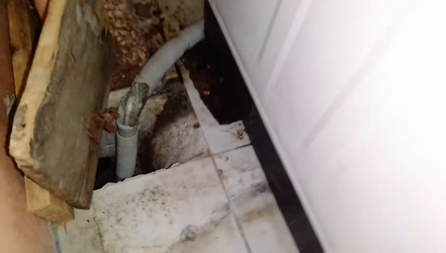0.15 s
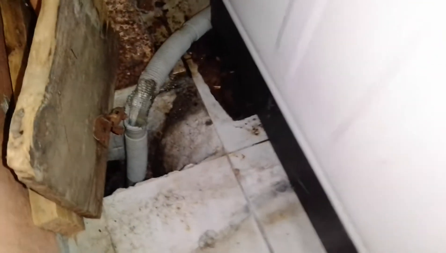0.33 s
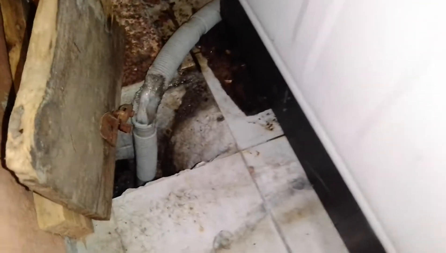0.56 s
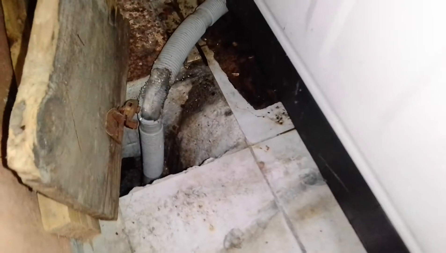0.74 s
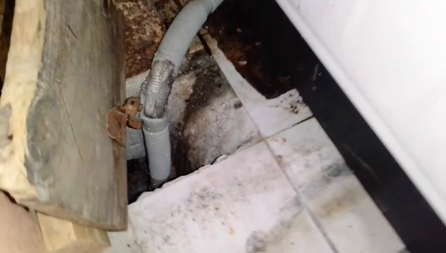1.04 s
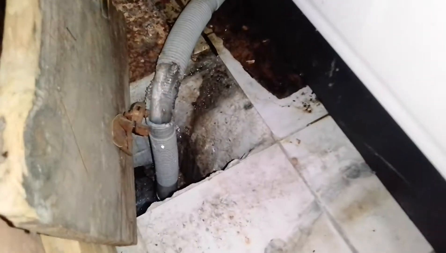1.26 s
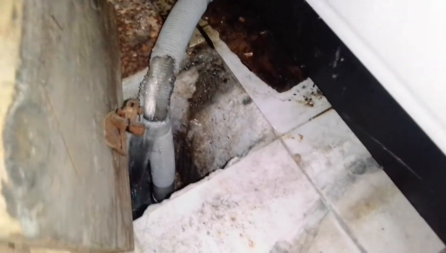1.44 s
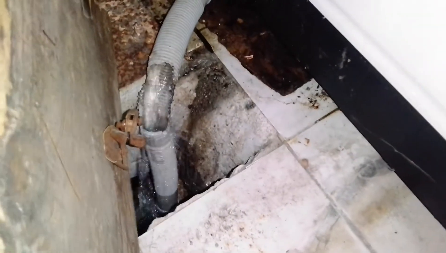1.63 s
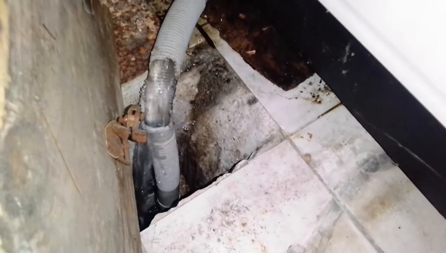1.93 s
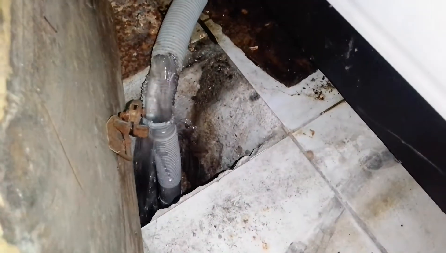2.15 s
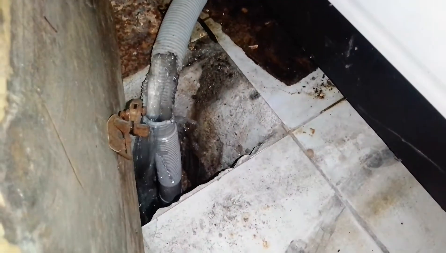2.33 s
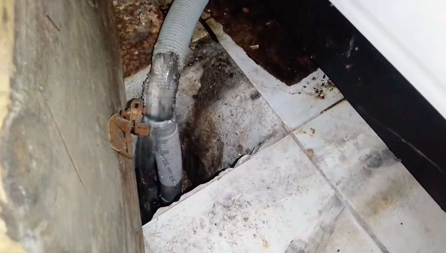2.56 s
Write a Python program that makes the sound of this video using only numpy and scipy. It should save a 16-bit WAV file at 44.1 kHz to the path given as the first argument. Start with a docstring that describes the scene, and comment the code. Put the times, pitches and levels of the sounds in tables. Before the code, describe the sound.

Water pours and splashes from a drain hose into a floor pipe, growing louder and brighter

```python
"""In a hole in a tiled floor, between boards and an appliance, a drain hose pours water into a pipe.
Crowds of small bubbles, noise drops and steady noise make the rush; single rings make splashes and glugs;
short noise puffs make spray, and noise in a sliding resonance makes the burble of the pipe.
The microphone moves closer: the sound grows and its colour shifts and opens towards the treble."""
import sys
import numpy as np
from scipy import signal
from scipy.fft import rfft, irfft
from scipy.io import wavfile
from scipy.ndimage import uniform_filter1d

SR = 44100
rng = np.random.default_rng(int(sys.argv[2]) if len(sys.argv) > 2 else 0)


def unload_audio(sound):
    """Save the sound as a 16-bit wav file, at the path given as the first command line argument."""
    columns = np.transpose(np.atleast_2d(sound))
    # keep every value between -1 and 1, then stretch to whole-number steps
    steps = np.round(np.clip(columns, -1, 1) * 32767)
    wavfile.write(sys.argv[1], SR, steps.astype(np.int16))


def voltage_ratio(level):
    """Linear amplitude factor for a level in decibels (scalar or array-like)."""
    return 10 ** (np.asarray(level, float) / 20)


N = 118629  # length [samples]

# Colour of the splashing at four places on the way in, far to near;
# for each place a list of (frequency [Hz], relative level [dB per Hz])
PLACE_COLOURS = [
    [(450, -17), (760, 0), (1070, -23), (1510, 0), (2020, -3), (2400, -2.5), (2720, -5), (2850, -6),
     (3620, -5.5), (4430, -11), (4750, -4), (4930, -12), (5090, -22), (5700, -24.5), (7500, -33),
     (9750, -65)],
    [(450, -28), (760, -3), (813, -14), (877, -17), (938, -10), (1050, -2), (1150, -19.5), (1530, -2.5),
     (1750, -5.5), (2240, -2), (3200, -4.5), (3390, -18), (3870, -11.5), (4180, -14.5), (4870, -20),
     (5310, -20), (7500, -33), (9750, -68)],
    [(450, -30), (760, -13), (886, -5), (994, -15), (1090, -13.5), (1230, -18.5), (1420, -6.5), (1670, -4),
     (1820, -6.5), (2240, -7), (2520, -7), (3110, -8.5), (3290, -9.5), (4180, -2.5), (4430, -5),
     (4830, -18), (5790, -25.5), (7500, -35.5), (9750, -54)],
    [(450, -53), (760, -15), (903, -6.5), (1000, -14.5), (1100, -10.5), (1200, -8), (1620, -3.5),
     (1980, -6.5), (2120, -4), (2220, -9.5), (2400, -0.5), (2640, -0.5), (2930, -5.5), (3260, -4),
     (4100, 0.5), (5260, -6.5), (5900, -22.5), (7500, -31.5), (9750, -62)],
]
# Way of the microphone: (time [s], place [0-3, index among the colours])
MICROPHONE_WAY = [(0, 0), (.15, .15), (.25, .9), (.4, 1), (1.04, 1.05), (1.09, 1.9), (1.62, 2), (1.68, 2.5),
                  (1.96, 2.6), (2.05, 3), (2.69, 3)]
# Stream before hollow and patches: (time [s], splashing level [dB], gurgle level [dB], hiss level [dB])
STREAM_LEVELS = [(0, -44.5, -44.5, -65.5), (.15, -47, -54, -68.5), (0.421, -46.5, -57.5, -67.5),
                 (.5, -48.5, -52, -67), (.9, -46, -53, -68.5), (1.0, -45.5, -48, -68),
                 (1.1, -42.5, -48, -67.5), (1.33, -45, -51, -68), (1.4, -43.5, -47.5, -65),
                 (1.551, -41.5, -51, -64.5), (1.7, -40, -48.5, -61.5), (1.95, -40, -48, -62),
                 (2.059, -36, -47, -58), (2.09, -45.5, -66, -67), (2.13, -36, -45.5, -60),
                 (2.35, -39, -50, -60.5), (2.5, -35, -51, -59.5), (2.69, -37.5, -49, -63.5)]
# Colour of the gurgle: (frequency [Hz], relative level [dB per Hz])
GURGLE_COLOUR = [(120, -75), (200, -24.5), (268, -7.5), (310, -11), (350, -4), (410, -9.5), (474, -2.5),
                 (640, -5), (760, -12.5), (1100, -11), (1500, -46)]
# Colour of the hiss: (frequency [Hz], relative level [dB per Hz])
HISS_COLOUR = [(3000, -50), (6000, -14), (8000, -4), (10000, -8), (12500, -2.5), (15500, 3.5),
               (16100, -5.5)]
# Air resonances of pipe and hollow: (frequency [Hz], width [Hz], lift [dB])
HOLLOW_RESONANCES = [(362.6, 27, 3.5), (474, 20, 4), (907, 22, 4), (2534, 39, 3.5), (2716, 130, 1.5),
                     (3586, 36, 10.5), (4030, 55, -0.5)]
# One resonance heard only early on, fading out at a fixed time:
# (frequency [Hz], width [Hz], lift [dB], fades from [s], gone at [s])
EARLY_RESONANCE = (3870, 210, 9.1, 0.66, 0.79)
# Loud splashes: (time [s], level before the ring trim [dB], bubble pitch [Hz],
# wide burst relative to the stream, before its band filter [dB])
SPLASH_EVENTS = [(0.4723, -36.5, 1510, 2), (0.5212, -26.5, 2176, 13.5), (0.594, -26, 2228, 5),
                 (0.6328, -32.5, 3780, -8), (0.6866, -31.5, 2660, -1), (0.7188, -35, 2150, 1),
                 (0.76, -37, 3050, 13.5), (0.833, -27, 1950, 5), (0.9544, -31.5, 2490, 8.5),
                 (0.9943, -31, 2320, 2.5), (1.0876, -30.5, 4000, 12.5), (1.1897, -28, 4280, 1),
                 (1.29, -29.5, 4340, -15), (1.3093, -37, 3470, 11), (1.351, -18.5, 4130, 19),
                 (1.372, -23, 4090, -1), (1.4363, -32.5, 1620, 9), (1.479, -32, 3670, 11.5),
                 (1.5402, -31, 1560, 6), (1.5626, -25, 4090, 6.5), (1.5934, -28.5, 1648, 7),
                 (1.6162, -23, 3580, 10), (1.6618, -18, 3830, 9.5), (1.6833, -24, 3360, 7),
                 (1.707, -24.5, 3190, -7), (1.7354, -22, 3160, 10), (1.7649, -26, 2543, 14),
                 (1.758, -23.5, 3540, -2), (1.8186, -26, 3726, 4.5), (1.867, -27, 2730, 9),
                 (1.9656, -27, 3780, 5.5), (2.0394, -23, 4160, 5.5), (2.0664, -22, 2640, 5),
                 (2.1068, -21, 3770, 12.5), (2.14, -33, 3530, 4), (2.1952, -19, 2676, 11.5),
                 (2.2486, -25.5, 2490, -16), (2.265, -27, 2730, -13), (2.4375, -27, 2690, 12.5),
                 (2.4784, -22, 3630, 5.5), (2.5296, -15, 3840, 6), (2.591, -24, 3550, 4),
                 (2.6631, -14.5, 4380, 12.5)]
# Bubbles that climb fast as they reach the surface:
# (time [s], peak level before the room [dB], start pitch [Hz], pitch rise [fraction per decay length])
CHIRP_EVENTS = [(1.6392, -27, 2750, 0.4), (1.772, -25.5, 3240, 0.215)]
# Low glugs in the pipe: (time [s], level before the ring trim [dB], pitch [Hz])
GLUG_EVENTS = [(0.0, -31, 267), (0.083, -27.5, 617), (0.443, -27.5, 965), (0.519, -25, 791),
               (0.975, -24, 603), (1.021, -22.5, 473), (1.113, -22.5, 428), (1.351, -26.5, 438),
               (1.352, -26.5, 670), (1.428, -20, 507), (1.483, -24, 604), (1.728, -24, 353),
               (1.86, -28, 483), (2.094, -26.5, 473), (2.362, -23, 1043), (2.432, -27, 474),
               (2.476, -25, 440), (2.622, -20.5, 895)]
# Air column of the pipe, its pitch moving with the water level: (time [s], pitch [Hz], level [dB])
PIPE_BURBLE = [(0, 560, -58.5), (.5, 480, -61), (0.851, 350, -56), (0.979, 620, -50.5), (1.03, 480, -47),
               (1.071, 560, -53), (1.119, 440, -60), (1.26, 470, -53), (1.32, 470, -63), (1.36, 450, -47),
               (1.451, 540, -54.5), (1.599, 520, -61), (1.87, 480, -51), (1.931, 580, -48.5),
               (2.031, 540, -53), (2.111, 450, -54), (2.291, 530, -47), (2.39, 460, -56), (2.518, 350, -55),
               (2.69, 530, -48)]
# Spits of fine spray: (time [s], level before lift and colour [dB])
SPIT_EVENTS = [(0.3252, -49), (0.9765, -45), (1.208, -46), (1.3069, -47), (1.481, -45), (1.72, -44),
               (2.028, -35.5), (2.0991, -46), (2.392, -40.5), (2.4375, -43), (2.4784, -44), (2.5157, -39.5),
               (2.591, -38), (2.6638, -44)]
# Colour of the spray: (frequency [Hz], gain [dB])
SPRAY_COLOUR = [(5500, -15), (7000, -4.5), (10000, -14.5), (13000, -4), (15500, -5)]
# Steady hum of the room and hiss of the microphone: (frequency [Hz], relative level [dB per Hz])
FLOOR_COLOUR = [(20, -2.5), (60, -42), (80, -12.5), (120, -2.5), (165, -35), (200, 5), (300, -21),
                (5000, -22), (10000, -15), (15500, -10.5)]


def evened(x):
    """Scale a signal to an RMS of 1."""
    return x / np.sqrt(np.mean(x ** 2) + 1e-20)


def read(points, hz):
    """Read a curve at the given frequencies, along a logarithmic frequency axis."""
    f, value = np.transpose(points)
    return np.interp(np.log(hz + 1), np.log(f + 1), value)


def add(mix, s, sound):
    """Lay a sound into the mix at s seconds, cut off at the end."""
    part = mix[round(s * SR):][:len(sound)]
    part += sound[:len(part)]


def train(per_s, spread_db):
    """Sparse clicks at random times, of uneven size."""
    size = voltage_ratio(spread_db * np.minimum(rng.exponential(1, N), 4))
    return size * (rng.random(N) < per_s / SR)


def bubble(hz, cycles, rise, swell):
    """A ring that swells over some cycles, dies away and climbs in pitch; peak 1."""
    u = np.arange(int(4 * max(cycles, 2) * SR / hz)) * hz / SR  # time in cycles of the start pitch
    envelope = (1 - np.exp(-u / swell)) * np.exp(-2 * u / cycles)
    ring = envelope * np.sin(2 * np.pi * (u + rise * u ** 2 / (2 * cycles)))
    return ring / abs(ring).max()


def puff(rise_s, fall_s):
    """A burst of noise with a quick rise and an exponential fall."""
    t = np.arange(4000) / SR
    return (1 - np.exp(-t / rise_s)) * np.exp(-t / fall_s) * rng.standard_normal(4000)


def stream():
    """Bubbles of all sizes, wide drops and an even rush, each even in power per hertz, surging together."""
    bubbles_db, drops_db, rush_db, surge_db = -3, -4.5, -2.5, 1.2
    drop_fall_s = 0.0033
    clicks = train(per_s=2500, spread_db=4.5)
    pitches = np.geomspace(200, 19000, num=48)  # Hz
    chance = pitches ** .5 / sum(pitches ** .5)
    kind = rng.choice(48, N, p=chance)
    bubbles = np.zeros(N)
    for k, hz in enumerate(pitches):
        ring = bubble(hz, cycles=11.9, rise=0.049, swell=0.47)
        # high rings are shorter, so they are made stronger
        bubbles += signal.oaconvolve(clicks * (kind == k), ring * hz ** .75)[:N]

    fall = np.exp(-np.arange(2000) / SR / drop_fall_s)
    drop_envelope = signal.oaconvolve(train(per_s=150, spread_db=2.5), fall)[:N]
    drops = rng.standard_normal(N) * drop_envelope
    rush = rng.standard_normal(N)

    t = np.arange(N) / SR
    surge_hz = np.geomspace(4, 50, num=30)
    surge = evened(sum(np.sin(2 * np.pi * (f * t + rng.random())) / f ** 0.15 for f in surge_hz))
    mix = voltage_ratio(bubbles_db) * evened(bubbles) + voltage_ratio(drops_db) * evened(drops) + voltage_ratio(rush_db) * rush
    return mix * voltage_ratio(surge_db * surge)


def bursts():
    """The wide noise of each splash: a puff scaled against the stream, then weakened in bass and treble."""
    out = np.zeros(N)
    for s, _, _, burst_db in SPLASH_EVENTS:
        add(out, s, voltage_ratio(burst_db) * puff(rise_s=0.002, fall_s=0.0076))
    return signal.sosfilt(signal.butter(1, [900, 7000], "band", fs=SR, output="sos"), out)


def heard(x):
    """Colour the stream by microphone place, add gurgle and hiss power, then resonances and drifting patches."""
    patch_db = 2
    hz, t, z = signal.stft(x, SR, nperseg=2048, noverlap=1792)

    def unit(points):
        """A colour in dB with a mean power of 1."""
        db = read(points, hz)
        return db - 10 * np.log10(np.mean(voltage_ratio(2 * db)))

    def resonance(f, width, db):
        """A peak in dB, halved at half the width to either side."""
        return db / (1 + (2 * (hz - f) / width) ** 2)

    place = np.interp(t, *np.transpose(MICROPHONE_WAY))
    share = np.maximum(1 - abs(place - np.arange(4)[:, None]), 0)  # blend of neighbouring places
    splashing = np.transpose([unit(c) for c in PLACE_COLOURS]) @ share
    colours = [splashing, unit(GURGLE_COLOUR)[:, None], unit(HISS_COLOUR)[:, None]]
    s, *levels = np.transpose(STREAM_LEVELS)
    power = sum(voltage_ratio(2 * (colour + np.interp(t, s, db))) for colour, db in zip(colours, levels))

    patches = uniform_filter1d(rng.standard_normal(z.shape), size=8, axis=0)
    patches = evened(uniform_filter1d(patches, size=16, axis=1))
    hollow_db = sum(resonance(*row) for row in HOLLOW_RESONANCES)
    f, width, db, *fade_s = EARLY_RESONANCE
    early_db = np.outer(resonance(f, width, db), np.interp(t, fade_s, [1, 0]))
    gain = np.sqrt(power) * voltage_ratio(hollow_db[:, None] + early_db + patch_db * patches)
    return signal.istft(z * gain, SR, nperseg=2048, noverlap=1792)[1][:N]


def splashes():
    """Each splash rings one clear bubble and two smaller ones near its pitch just after; a few bubbles chirp."""
    ring_db, follow_db = -7.5, -6.5  # trim of the ring, followers below it
    follow_s = 0.008  # longest delay of a follower
    swell = 11  # cycles
    out = np.zeros(N)
    for s, db, hz, _ in SPLASH_EVENTS:
        add(out, s, voltage_ratio(db + ring_db) * bubble(hz, 15.3, 0.014, swell))
        for late, shift in rng.random((2, 2)):
            follow_hz = hz * (1 + 0.32 * (shift - .5))
            follower = bubble(follow_hz, 10.2, 0.1, swell)
            add(out, s + follow_s * late, voltage_ratio(db + ring_db + follow_db) * follower)
    for s, db, hz, rise in CHIRP_EVENTS:
        add(out, s, voltage_ratio(db) * bubble(hz, 7.9, rise, swell))
    return out


def glugs():
    """Large bubbles close in the pipe, each a low, short ring."""
    ring_db = -13.5
    out = np.zeros(N)
    for s, db, hz in GLUG_EVENTS:
        add(out, s, voltage_ratio(db + ring_db) * bubble(hz, cycles=6.5, rise=0.013, swell=2.5))
    return out


def burble():
    """Noise rings in one resonance of the pipe's air that slides with the water level."""
    width_hz = 130
    s, hz, db = np.transpose(PIPE_BURBLE)
    t = np.arange(N) / SR
    r = np.exp(-np.pi * width_hz / SR)
    noise = rng.standard_normal(N) + 1j * rng.standard_normal(N)
    slow = signal.lfilter([1], [1, -2 * r, r * r], noise)  # narrow noise around 0 Hz
    turn = np.exp(2j * np.pi * np.cumsum(np.interp(t, s, hz)) / SR)  # moves it up to the pitch
    return voltage_ratio(np.interp(t, s, db)) * evened((slow * turn).real)


def spits():
    """Short bursts of treble hiss as spray hits the tiles."""
    lift_db = 4
    out = np.zeros(N)
    for s, db in SPIT_EVENTS:
        add(out, s, voltage_ratio(db + lift_db) * puff(rise_s=0.003, fall_s=0.0072))
    return irfft(rfft(out) * voltage_ratio(read(SPRAY_COLOUR, np.fft.rfftfreq(N, 1 / SR))), N)


def room(x):
    """The walls of the hollow answer with a short dense tail of random echoes."""
    tail_db, t60_s = -7, 0.17
    t = np.arange(SR // 3) / SR
    signs = rng.choice([-1., 1.], len(t))
    chosen = (rng.random(len(t)) < .1) * (t > .002)  # a tenth of the instants, after 2 ms
    taps = signs * chosen * voltage_ratio(-60 * t / t60_s)
    return x + voltage_ratio(tail_db) * signal.oaconvolve(x, taps / np.linalg.norm(taps))[:N]


def floor():
    """Even background: noise coloured as room hum and microphone hiss."""
    level_db = -67.5
    colour = voltage_ratio(read(FLOOR_COLOUR, np.fft.rfftfreq(N, 1 / SR)))
    return voltage_ratio(level_db) * evened(irfft(rfft(rng.standard_normal(N)) * colour, N))


def scene():
    """The coloured stream, the burble, single water sounds in the hollow, and the background."""
    water = heard(evened(room(evened(stream()) + bursts())))
    single = room(splashes() + glugs() + spits())
    return (water + burble() + single + floor())[None]


def top_cut(x):
    """Nothing passes above the cut-off."""
    return signal.sosfilt(signal.butter(12, 16040, fs=SR, output="sos"), x)


def record(dry):
    """Hand on the finished mono mix."""
    return top_cut(dry)


dry = scene()
out = record(dry)
unload_audio(out)
```